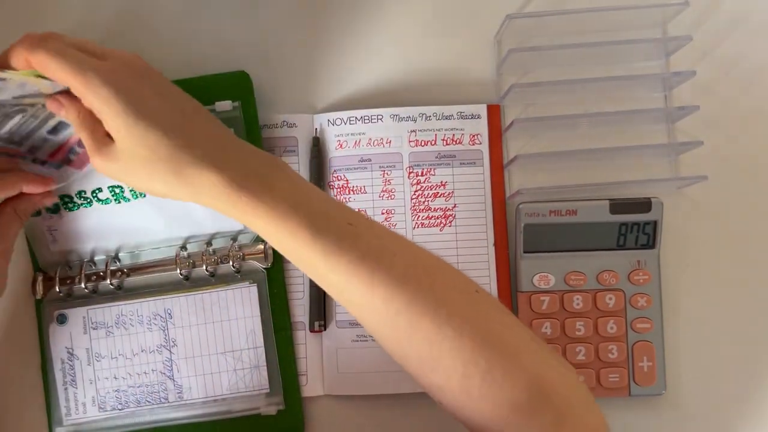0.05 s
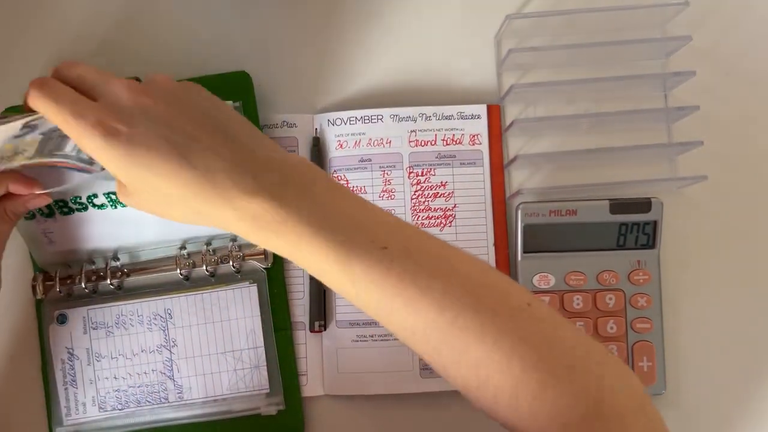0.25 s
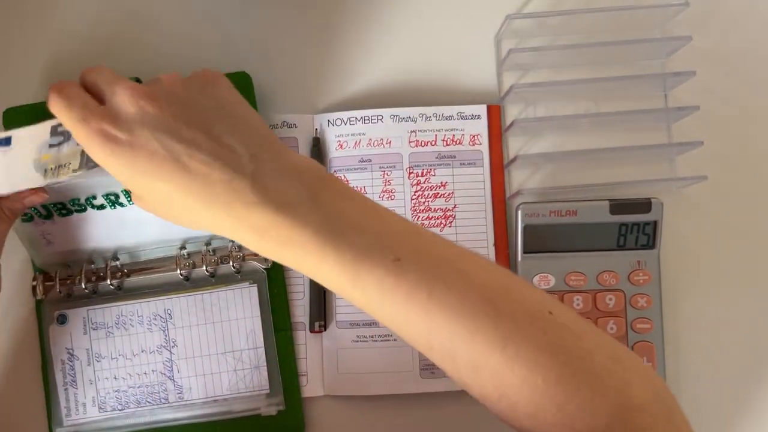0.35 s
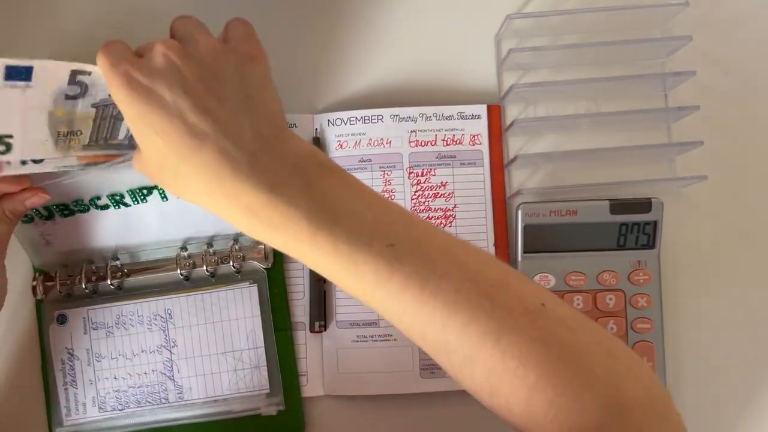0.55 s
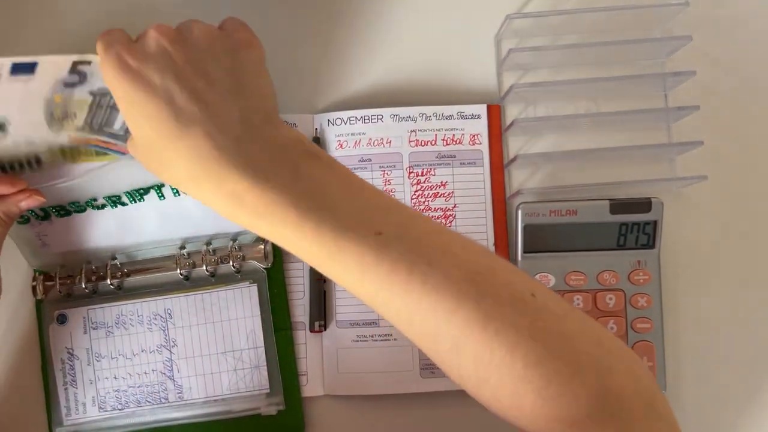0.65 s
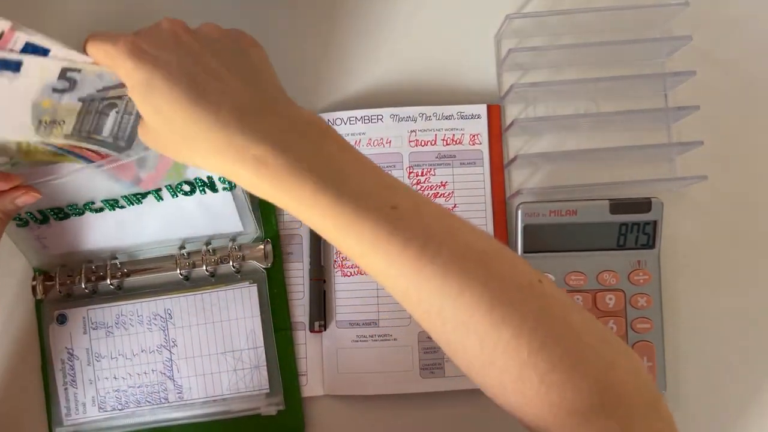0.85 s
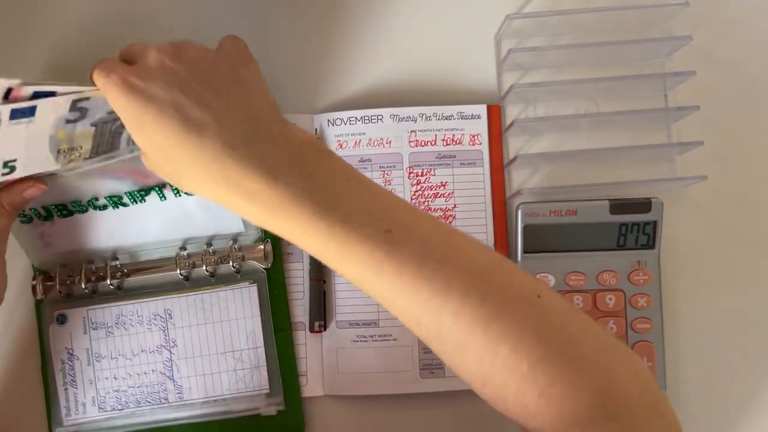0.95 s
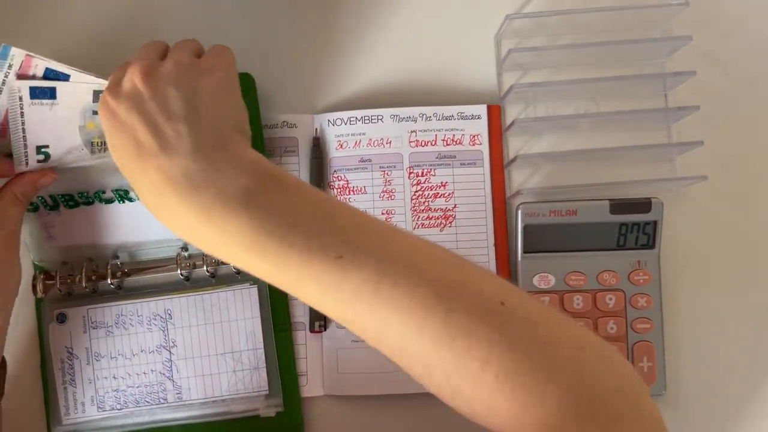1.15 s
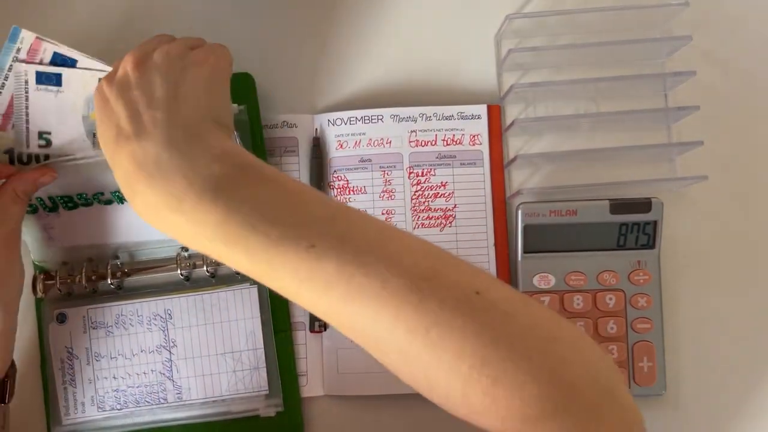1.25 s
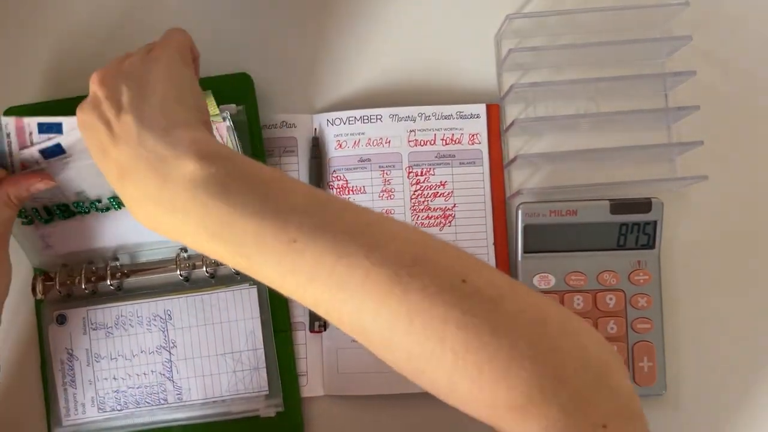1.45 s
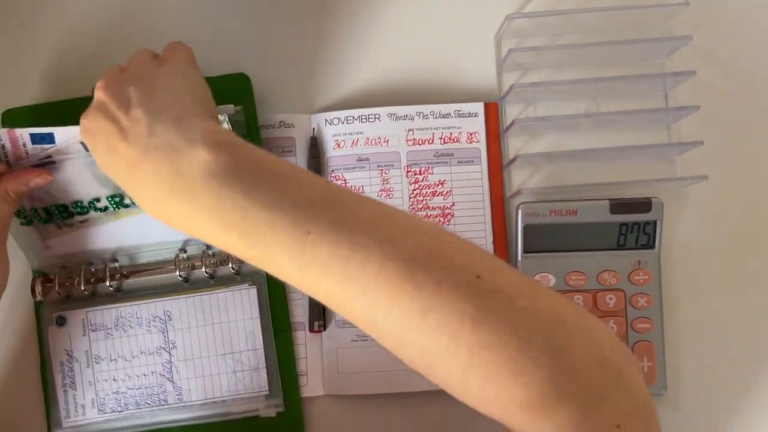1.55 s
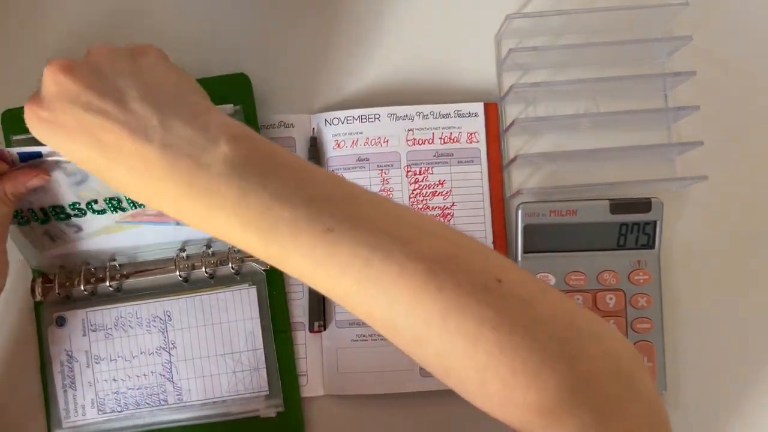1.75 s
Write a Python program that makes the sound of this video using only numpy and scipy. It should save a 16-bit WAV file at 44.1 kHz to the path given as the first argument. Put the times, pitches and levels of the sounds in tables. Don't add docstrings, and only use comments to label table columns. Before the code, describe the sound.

Plastic film crackles and snaps as paper money is slid and shuffled in a quiet room

```python
import sys
import numpy as np
from scipy import signal
from scipy.fft import rfft, irfft
from scipy.io import wavfile
from scipy.ndimage import uniform_filter1d

SR = 44100
rng = np.random.default_rng(int(sys.argv[2]) if len(sys.argv) > 2 else 0)


def pcm_store(signal):
    levels = np.round(np.clip(np.atleast_2d(signal), -1, 1) * 32767)
    wavfile.write(sys.argv[1], SR, levels.astype(np.int16).T)


def gain_from_decibels(decibels):
    exponent = np.asarray(decibels, float) / 20
    return 10 ** exponent


N = 79380


def rms_one(x):
    return x / np.sqrt(np.mean(x ** 2) + 1e-20)


def butter(x, order, hz, kind="low"):
    return signal.sosfilt(signal.butter(order, hz, kind, fs=SR, output="sos"), x)


def colour(x, points):
    hz = np.maximum(np.arange(1025) * SR / 2048, 10)
    table = np.array(points)
    log_gain = np.interp(np.log(hz), np.log(table[:, 0]), table[:, 1]) * np.log(10) / 20
    cepstrum = irfft(log_gain)
    cepstrum[1:1024] *= 2
    cepstrum[1025:] = 0
    impulse = irfft(np.exp(rfft(cepstrum)))
    return signal.fftconvolve(x, impulse)[:len(x)]


def resonance(x, hz, width_hz):
    r = np.exp(-np.pi * width_hz / SR)
    poles = [1, -2 * r * np.cos(2 * np.pi * hz / SR), r * r]
    return signal.lfilter([(1 - r * r) / 2, 0, (r * r - 1) / 2], poles, x)


def drift(rate_hz):
    r = np.exp(-2 * np.pi * rate_hz / SR)
    wander = signal.lfilter([1], [1, -2 * r, r * r], rng.standard_normal(N + SR))
    return rms_one(wander[SR:])


def clicks(shape, per_s, spread_db):
    size = gain_from_decibels(spread_db * np.minimum(rng.exponential(1, shape), 4))
    size = size * rng.choice([-1, 1], shape)
    return size * (rng.random(shape) < per_s / SR) + 0.13 * rng.standard_normal(shape)


def bursts(rows, per_s, q, scatter, first, lowest=-1):
    rise_share = 0.49
    out, t = np.zeros(N + SR), np.arange(2600) / SR
    trains = clicks((len(rows), len(t)), per_s, spread_db=4)
    dealt = rng.integers(0, 5, trains.shape)
    for (start_s, peak_db, hz, length_s), train, deal in zip(rows, trains, dealt):
        creases = train * np.minimum(t / (rise_share * length_s), 1) * np.exp(-t / length_s)
        pitches = np.minimum(hz * np.exp(scatter * np.array([0, 0, lowest, 1, 2])), SR / 3)
        burst = np.zeros(len(t))
        for k, pitch in enumerate(pitches):
            lead = first * (t == 0) * (-1) ** k
            burst += resonance(creases * (deal == k) + lead, pitch, pitch / q)
        level = gain_from_decibels(peak_db) * np.sqrt(length_s * SR / np.sum(burst ** 2)) / 4
        start = int(start_s * SR)
        out[start:start + len(t)] += level * burst
    return out[:N]


def rings(rows, cycles):
    overtone, overtone_db = 1.6, -15
    linger_db, linger_cycles = -17.5, 8.9
    out, t = np.zeros(N + SR), np.arange(600) / SR
    phases = 2 * np.pi * rng.random((len(rows), 2))
    for (start_s, peak_db, hz), phase in zip(rows, phases):
        age = t * hz / cycles
        tone = np.sin(2 * np.pi * hz * t + phase[0])
        tone += gain_from_decibels(overtone_db) * np.sin(2 * np.pi * overtone * hz * t + phase[1])
        swell = (age * np.exp(1 - age)) ** 2
        linger = gain_from_decibels(linger_db) * np.minimum(age, 1) ** 2 * np.exp(-age / linger_cycles)
        start = int(start_s * SR)
        out[start:start + len(t)] += gain_from_decibels(peak_db) * (swell + linger) * tone
    return out[:N]


def sleeve_snaps():
    # start_s, peak_db, centre_hz
    snaps = [
        (0.0148, -39, 4200),
        (0.2923, -40, 4300),
        (0.3889, -19, 5600),
        (.6191, -25, 6000),
        (1.1553, -22, 4700),
        (1.1818, -30, 5600),
        (1.3223, -35, 4700),
        (1.6912, -40, 4670),
        (1.7932, -41, 4600),
    ]
    snap_s = 0.0025
    return bursts([(*row, snap_s) for row in snaps], 9000, q=4.5, scatter=0.44, first=3.0, lowest=-2)


def sleeve_crumples():
    # start_s, peak_db, centre_hz, length_s
    crumples = [(.2305, -36, 4730, 0.0018), (.2408, -26, 5600, 0.0063), (.2484, -33, 2920, 0.0013),
                (.3034, -37, 3940, 0.0038), (.3521, -44, 4800, 0.0054), (.3910, -14, 3970, 0.0037),
                (.4010, -20, 4740, 0.0066), (.4200, -41, 4750, 0.0047), (.5744, -37.5, 5300, 0.0017),
                (.6324, -28.5, 4660, 0.0023), (.6268, -47, 5000, 0.0015), (.641, -38, 5000, .004),
                (.7075, -28.5, 5100, 0.008), (.7125, -32, 5850, 0.004), (.7178, -18, 4200, 0.0022),
                (.7264, -37, 4570, 0.0037), (.7404, -39, 4330, 0.005), (.7524, -41, 4700, 0.0098),
                (.7895, -34.5, 4270, 0.01), (.9150, -22.5, 4070, 0.0028), (.9205, -32, 3880, 0.0083),
                (.988, -34.5, 4300, 0.0058), (1.6955, -32, 4340, 0.002)]
    return butter(bursts(crumples, 14000, q=2.4, scatter=0.58, first=0.27), 2, 9600)


def sleeve_ticks():
    # start_s, peak_db, pitch_hz
    ticks = [(.0240, -54, 5060), (.207, -46.5, 4400), (.233, -51, 4910), (.2429, -34, 7500),
             (.2445, -48, 3220), (.2459, -41, 5160), (.2492, -43, 3300), (.3256, -46, 3960),
             (.3435, -48, 5000), (.3531, -38.5, 4600), (.389, -19, 6300), (.3920, -22, 5430),
             (.3912, -25, 3100), (.3944, -20, 4910), (.3958, -22, 4450), (.3969, -26, 4230),
             (.3985, -31, 4670), (.4009, -30, 5430), (.4018, -30, 4670), (.4037, -29, 5000),
             (.4055, -27, 4910), (.4073, -38, 4770), (.4139, -35, 4500), (.4188, -35, 4600),
             (.4204, -34, 4910), (.4236, -33, 4670), (.4578, -34, 5160), (.5615, -43, 5200),
             (.6191, -32.5, 5760), (.6206, -35.5, 4640), (.7129, -40, 5160), (.7138, -36.5, 8000),
             (.7148, -32.5, 3070), (.7183, -27.5, 3810), (.7197, -40, 5050), (.7415, -42, 4330),
             (.7925, -33, 3670), (.9146, -29, 5150), (.9164, -27, 4740), (.9198, -36, 4000),
             (.9215, -29.5, 4200), (.9236, -48, 4530), (.9255, -36, 4800), (.9875, -37, 4600),
             (1.0742, -41.5, 4600), (1.1554, -25.5, 4780), (1.1555, -34, 6730), (1.1575, -59, 4430),
             (1.1638, -40, 5800), (1.169, -54, 5000), (1.1775, -34.5, 4870), (1.5685, -61, 4600),
             (1.6958, -38.5, 4570), (1.6981, -41.5, 5570), (1.6998, -48, 4700)]
    return rings(ticks, cycles=1.5)


def sleeve():
    # hz, db
    film_body = [(1200, -9), (2000, -17), (3000, 2), (5200, 3.5), (8000, -6.5), (12000, -13.5),
                 (16000, -18)]
    return gain_from_decibels(1.5) * colour(sleeve_snaps() + sleeve_crumples(), film_body) + gain_from_decibels(2.0) * sleeve_ticks()


def note_pops():
    # start_s, peak_db, pitch_hz, length_s
    pops = [(.178, -46, 1520, 0.0025), (.2045, -53, 1380, 0.0018), (.231, -42.5, 1680, 0.0045),
            (.242, -38, 1480, 0.0062), (.2925, -35.5, 1290, 0.00074), (.389, -35.5, 1620, 0.0067),
            (.5733, -47, 1600, 0.0072), (.581, -48, 1690, 0.0042), (.6335, -41, 1370, 0.0022),
            (.7070, -41.5, 1800, 0.009), (.7178, -37, 1450, 0.0018), (.737, -42, 1590, 0.012),
            (.7525, -41, 1520, 0.0064), (.794, -39.5, 1520, 0.0048), (.8402, -43.5, 1560, 0.0037),
            (.855, -47, 1670, 0.0012), (.9015, -44.5, 1780, 0.0059), (.9135, -37.5, 1240, 0.0054),
            (.9872, -47.5, 1450, 0.0081), (1.1825, -40.5, 1960, 0.0041), (1.3230, -42, 1880, 0.002),
            (1.696, -41, 1670, 0.0021)]
    return butter(bursts(pops, 1500, q=5.5, scatter=0.09, first=2.0), 2, [1000, 2600], "band")


def binder_taps():
    # start_s, peak_db, pitch_hz
    taps = [(0.0279, -47, 460), (0.1769, -41, 474), (0.1916, -45, 487), (0.2322, -37, 900),
            (0.2459, -30.5, 500), (0.292, -45, 630), (0.306, -41.5, 740), (0.342, -37.5, 480),
            (.347, -47, 600), (0.3532, -36, 413), (0.39, -34, 644), (0.397, -34.5, 434), (0.586, -42, 576),
            (0.6215, -41.5, 584), (0.635, -41, 716), (0.717, -33, 430), (0.739, -49, 595),
            (0.753, -36, 600), (.789, -40, 480), (0.84, -37.5, 720), (0.852, -44, 395), (0.905, -43.5, 506),
            (.916, -41, 440), (0.99, -46, 428), (1.073, -46, 360), (1.1548, -40, 494), (1.1827, -34.5, 455),
            (1.2462, -38, 453),
        (1.321, -37, 940),
        (1.333, -49, 463),
        (1.6969, -37, 480),
    ]
    tap_s = 0.0044
    thuds = bursts([(*row, tap_s) for row in taps], 400, q=1.4, scatter=0.15, first=3.5)
    softened = uniform_filter1d(thuds, size=12, origin=5)
    return butter(softened, 2, [90, 1100], "band")


def note_pop_rings():
    # start_s, peak_db, pitch_hz
    single_pops = [(.015, -45.5, 2150), (.0345, -61, 1960), (.059, -64.5, 1700), (.1758, -39.5, 1560),
                   (.2125, -53, 1700), (.6196, -41, 2090), (.6332, -40.5, 1450), (.7396, -42, 1540),
                   (.7437, -45, 1700), (.7513, -39.5, 1480), (.7608, -46, 1430), (.7895, -29, 1720),
                   (.7924, -29, 1586), (.7963, -38, 1580), (.9115, -39.5, 1540), (.9169, -32, 1910),
                   (1.1559, -33.5, 2050), (1.1838, -38, 2230), (1.3223, -36, 1950), (1.5685, -57, 1490),
                   (1.6911, -45, 1860)]
    return rings(single_pops, cycles=1.3)


def notes():
    return gain_from_decibels(1.5) * note_pop_rings() + gain_from_decibels(8.0) * note_pops() + gain_from_decibels(6.5) * binder_taps()


def slide():
    # start_s, length_s, level_db, airy top re level_db, dull flutter re level_db
    strokes = [(0.004, 0.06, -80.5, -12, 12), (0.095, 0.056, -72, -28, -28),
               (0.116, 0.094, -62.5, -39, -16), (0.178, 0.14, -53.5, -8, -1), (0.276, 0.22, -56, -13, 3),
               (0.396, 0.15, -56.5, -29, -18), (0.441, 0.26, -62.5, -18, -2), (0.608, 0.098, -60, -15, -17),
               (0.683, 0.15, -52, -8, -5), (0.779, 0.2, -61.5, -14, -8), (0.876, 0.15, -58.5, -24, -2),
               (0.979, 0.088, -58.5, -28, -9.5), (1.027, 0.09, -54.5, -21, -10),
               (1.158, 0.19, -77, -17, -5), (1.308, 0.08, -63.5, -30, 2), (1.384, 0.18, -58, -20, -18),
               (1.518, 0.089, -68, -19, -9), (1.6, 0.057, -70, -15, -19), (1.627, 0.23, -69, -13, -12)]
    # hz, db per Hz
    film_tone = [(900, -3.5), (1900, 3.5), (2700, 2), (4730, 9), (8000, 0.5), (15000, -16.5)]
    # hz, db per Hz
    air_tone = [(4000, -30), (8500, 0), (16000, -4)]
    t = np.arange(N) / SR
    film, air, dull = gain_from_decibels([[-74], [-86], [-80]]) * np.ones((3, N))
    for start_s, length_s, level_db, air_db, dull_db in strokes:
        progress = np.clip((t - start_s) / (0.91 * length_s), 0, 1)
        shape = np.sin(np.pi * progress ** 0.94) ** 2
        swell = gain_from_decibels(level_db) * shape
        film = film + swell
        air = air + gain_from_decibels(air_db) * swell * shape
        dull = dull + gain_from_decibels(dull_db) * swell
    grains = rms_one(clicks(N, 2500, spread_db=3.2))
    hiss = rng.standard_normal(N) * gain_from_decibels(2.7 * drift(35)) + gain_from_decibels(3) * grains
    rustles = rms_one(clicks(N, 700, spread_db=3.5)) + 0.5 * rng.standard_normal(N)
    flutter = uniform_filter1d(resonance(rustles, 600, 800), size=5)
    rub = film * rms_one(colour(hiss, film_tone))
    return rub + air * rms_one(colour(hiss, air_tone)) + dull * rms_one(flutter)


def desk():
    # start_s, peak_db
    bumps = [
        (0.243, -47),
        (0.39, -44.5),
        (0.716, -47),
        (0.792, -49),
        (.916, -48.5),
        (1.3231, -43.5),
        (1.695, -52),
    ]
    bump_hz = 72
    push = np.zeros(N)
    for start_s, peak_db in bumps:
        push[int(start_s * SR)] = gain_from_decibels(peak_db)
    swing = resonance(resonance(push, bump_hz, 59), 2.0 * bump_hz, 123)
    return swing * push.max() / np.abs(swing).max()


def room(x):
    # hz, db
    echo_tone = [(400, -0.5), (1600, -3.5), (4500, -2.5), (9000, -2.5), (15000, -1)]
    t60_s, gap_s, level_db = 0.4, 0.0017, -9
    t = np.arange(SR // 2) / SR
    tail = rng.standard_normal(len(t)) * gain_from_decibels(-60 * t / t60_s) * np.clip(t / gap_s - 1, 0, 1)
    echoes = signal.fftconvolve(x, tail / np.sqrt(np.sum(tail ** 2)))[:N]
    return gain_from_decibels(level_db) * colour(echoes, echo_tone)


def room_tone():
    # hz, db per Hz
    tone = [(20, -2), (55, 3), (75, -6.5), (250, -14), (1200, -34), (2800, -31), (5500, -42),
            (16000, -39.5)]
    # hz, level_db
    hum_lines = [(29.7, -72.5), (50.5, -65)]
    t = np.arange(N) / SR
    hiss = rms_one(colour(rng.standard_normal(N), tone))
    rumble = rms_one(butter(rng.standard_normal(N + SR), 2, [18, 45], "band")[SR:])
    hum = np.zeros(N)
    for hz, level_db in hum_lines:
        hum += gain_from_decibels(level_db + 0.38 * drift(4.4)) * np.sin(2 * np.pi * hz * t) * np.sqrt(2)
    return gain_from_decibels(-62.5) * hiss + gain_from_decibels(-61.5) * rumble + hum


def scene():
    near = sleeve() + notes()
    return (near + room(near) + desk() + slide() + room_tone())[None, :]


def band_limit(x):
    return signal.sosfilt(signal.butter(12, 16500, fs=SR, output="sos"), x)


def record(dry):
    cut = signal.sosfilt(signal.cheby2(10, 40, 16300, fs=SR, output="sos"), dry)
    return band_limit(cut)


dry = scene()
out = record(dry)
pcm_store(out)
```